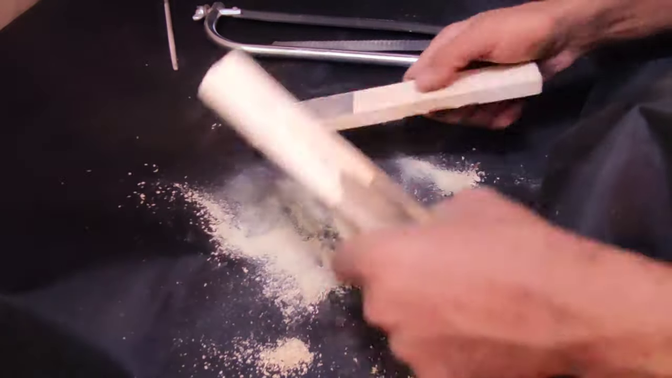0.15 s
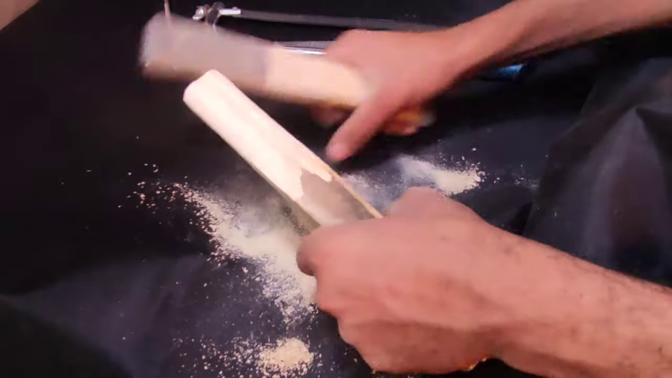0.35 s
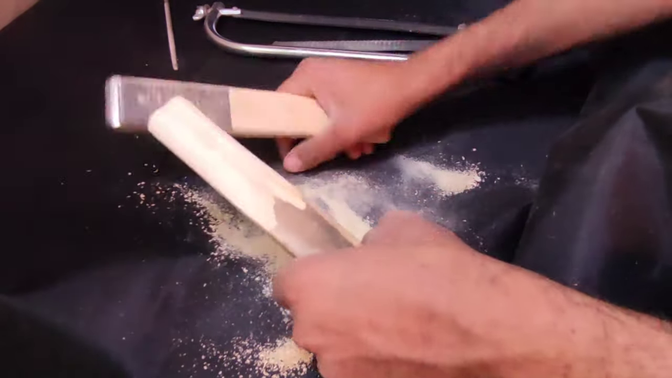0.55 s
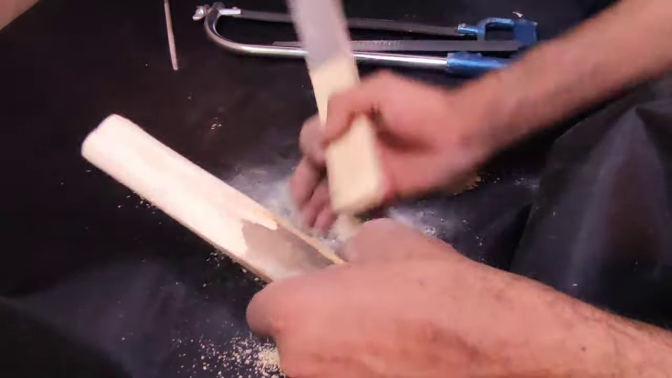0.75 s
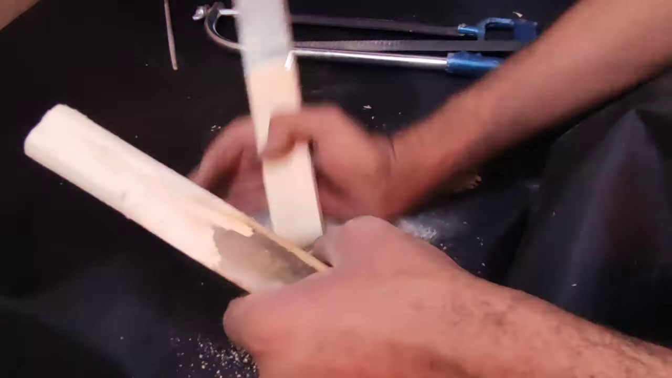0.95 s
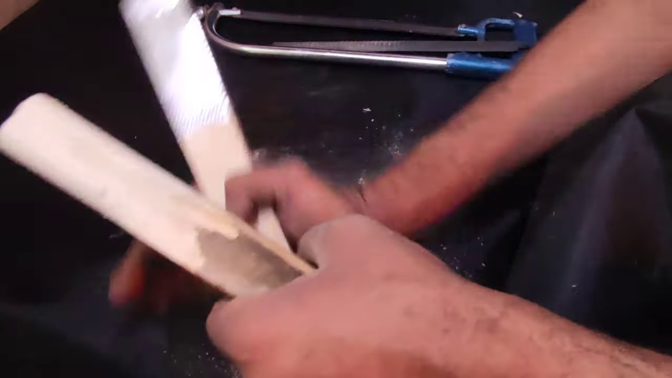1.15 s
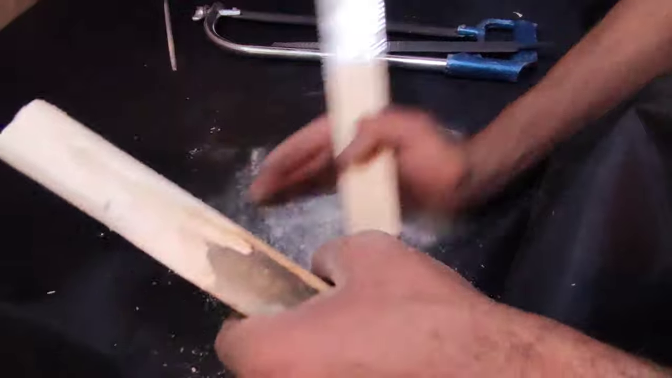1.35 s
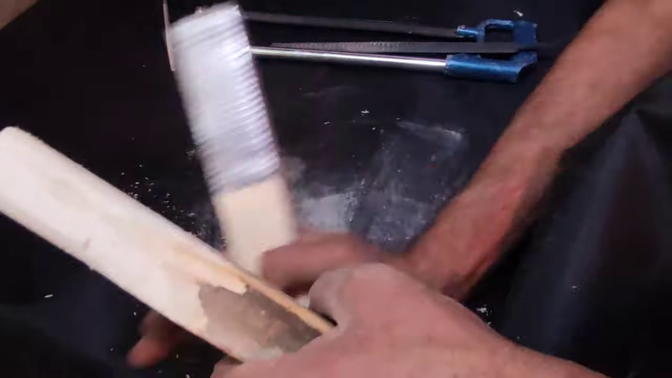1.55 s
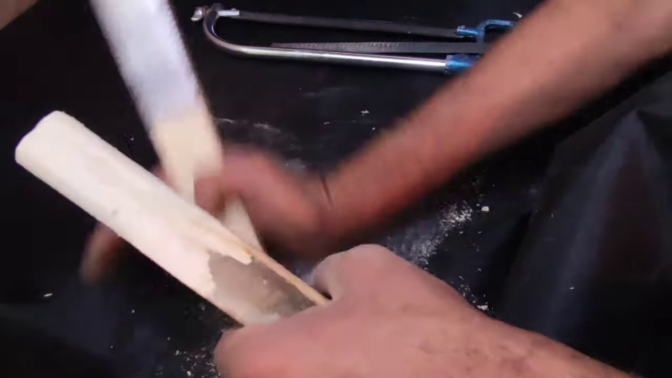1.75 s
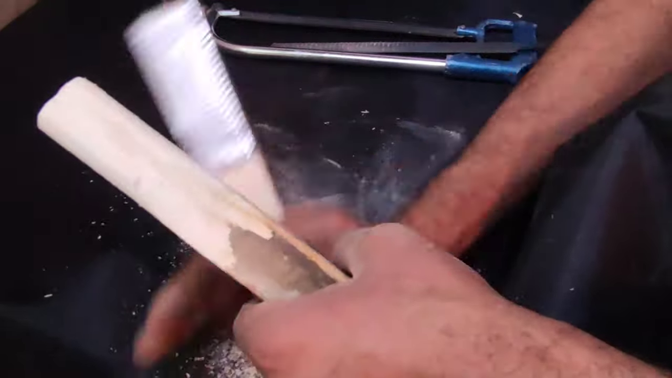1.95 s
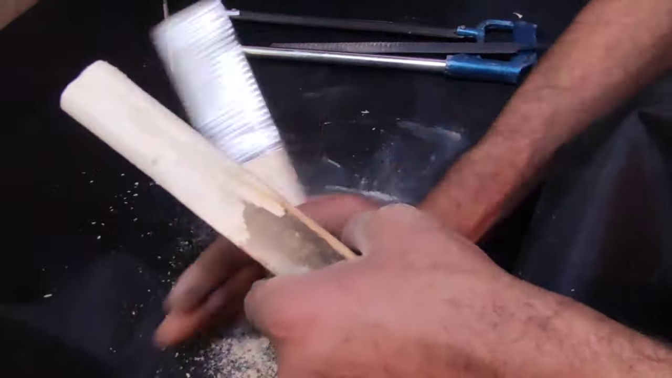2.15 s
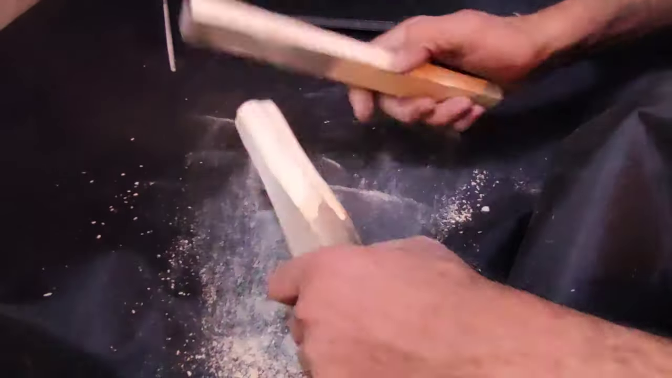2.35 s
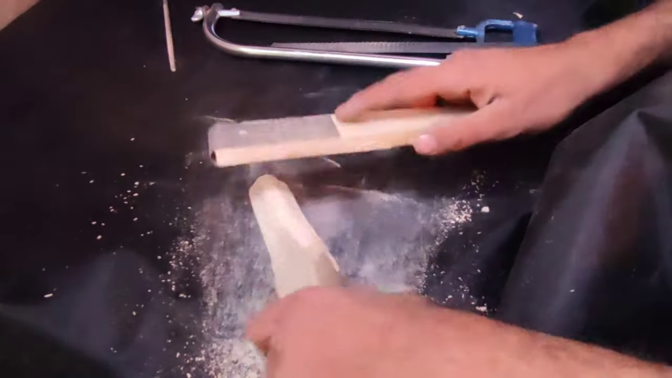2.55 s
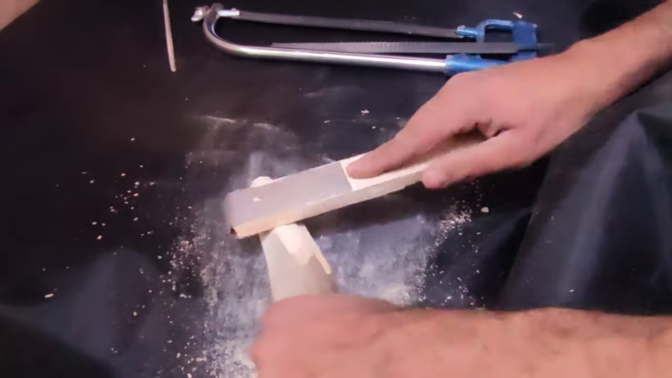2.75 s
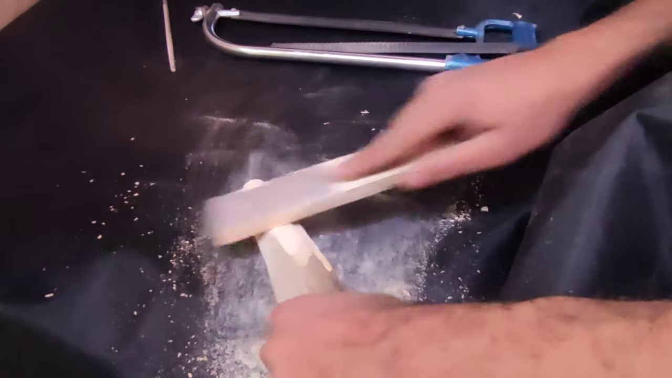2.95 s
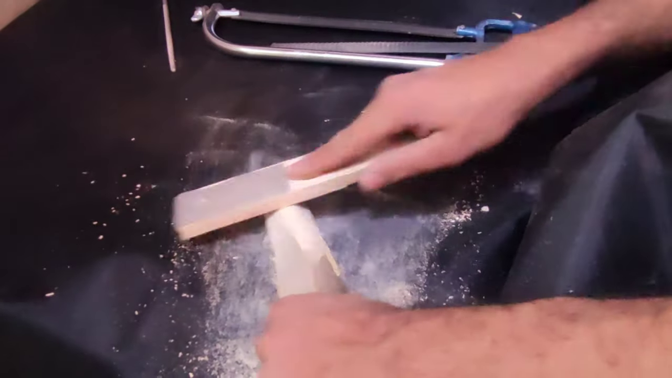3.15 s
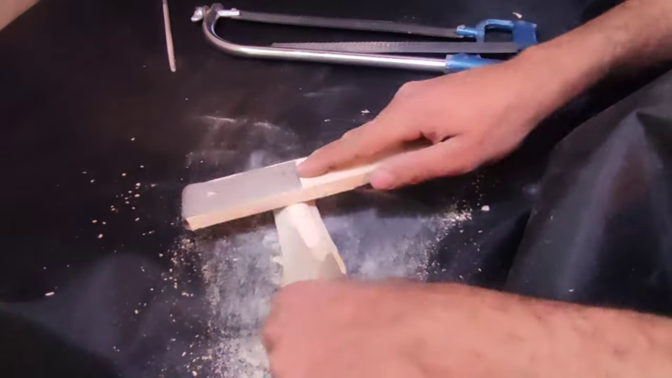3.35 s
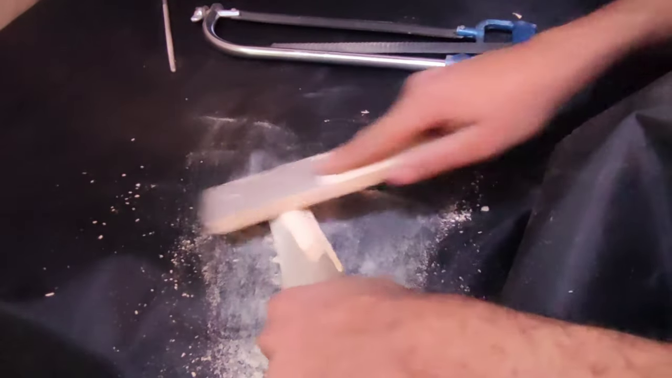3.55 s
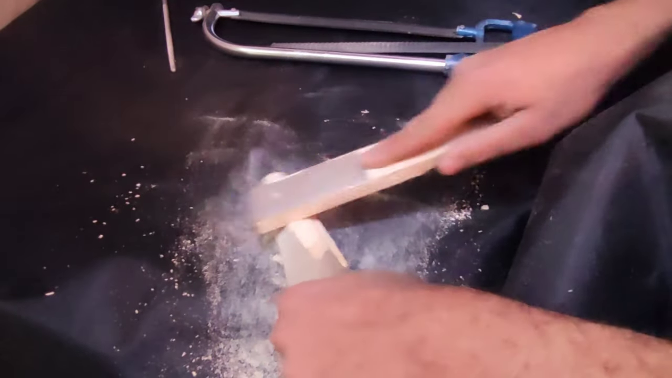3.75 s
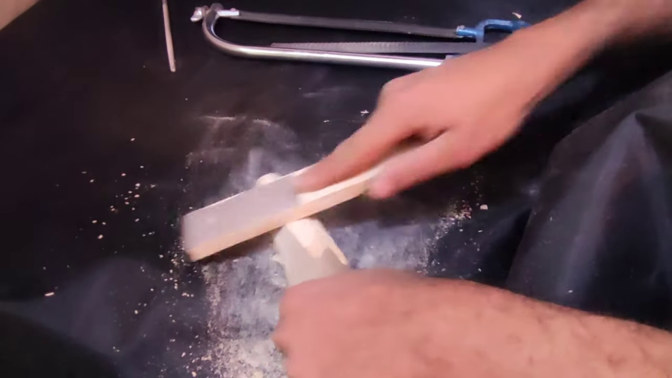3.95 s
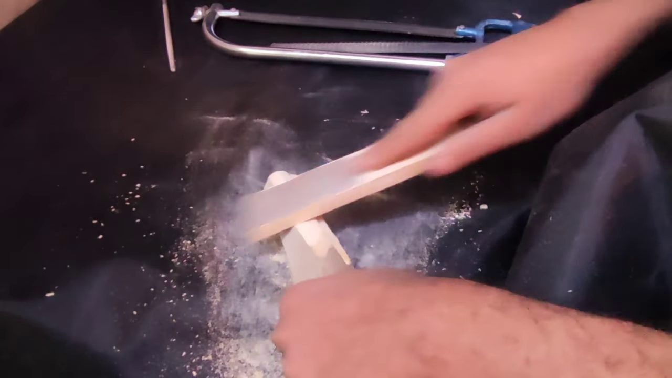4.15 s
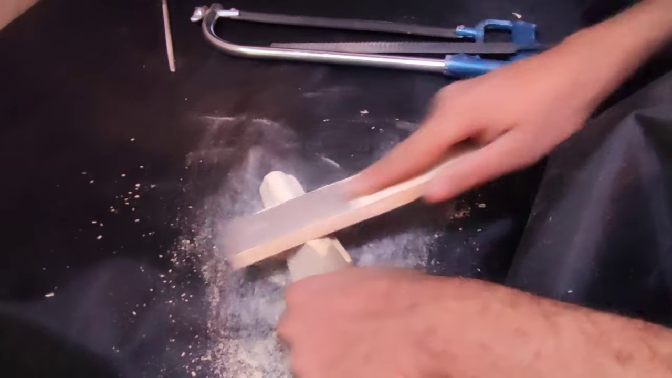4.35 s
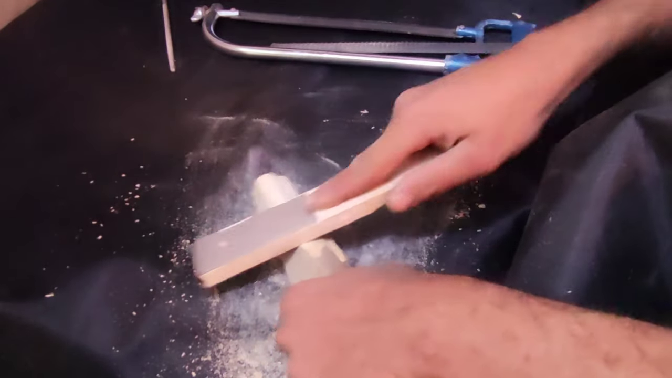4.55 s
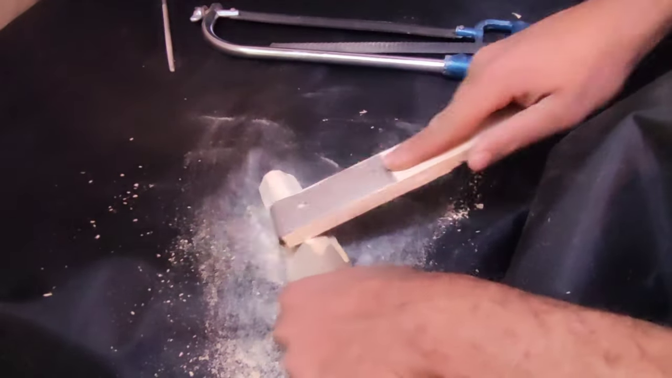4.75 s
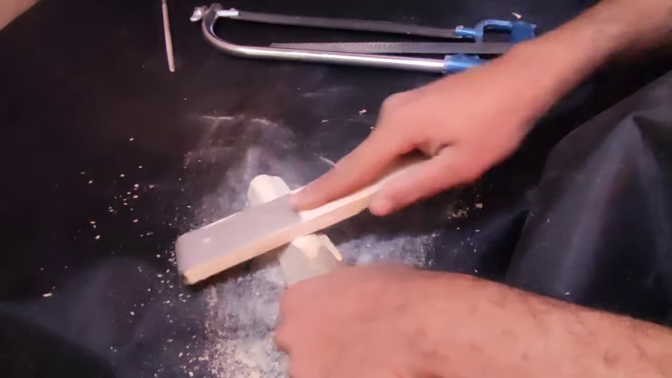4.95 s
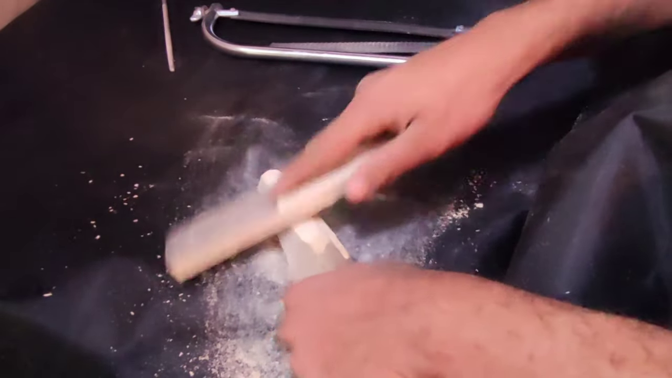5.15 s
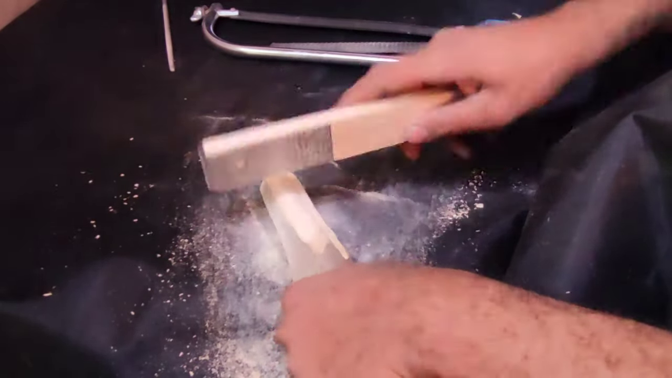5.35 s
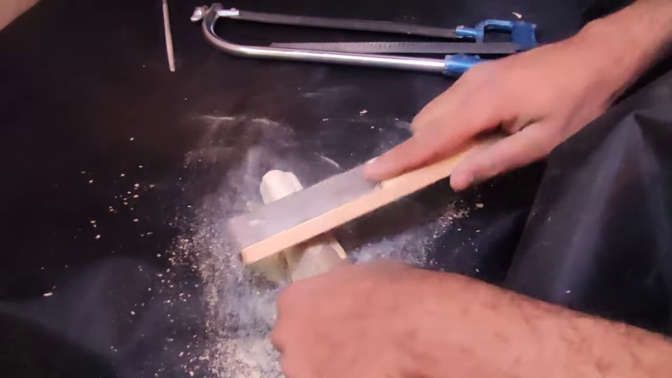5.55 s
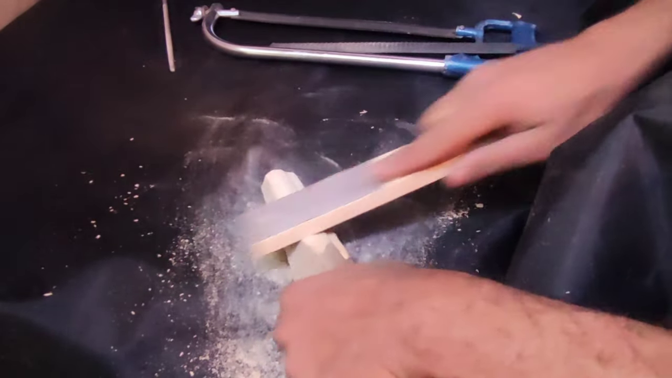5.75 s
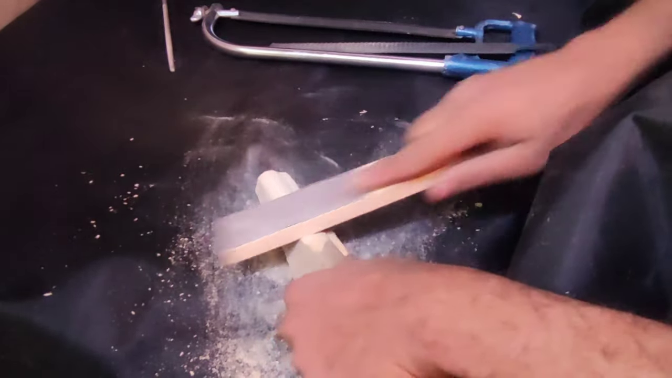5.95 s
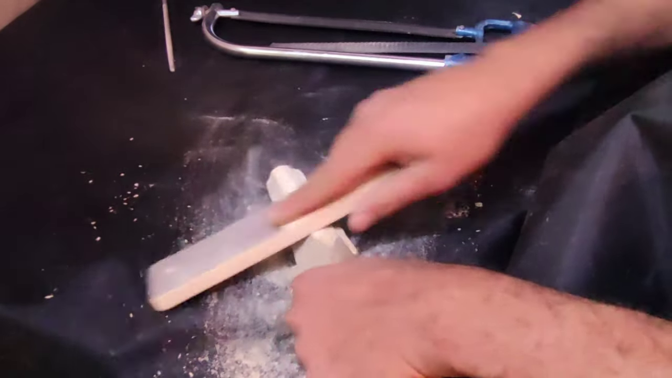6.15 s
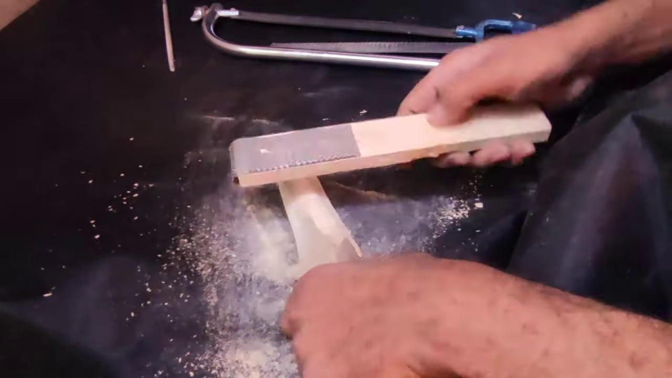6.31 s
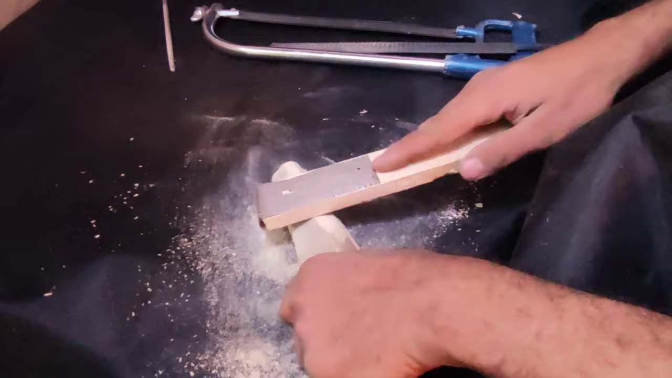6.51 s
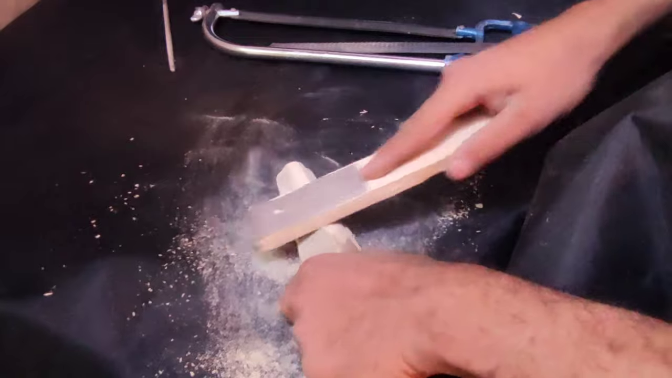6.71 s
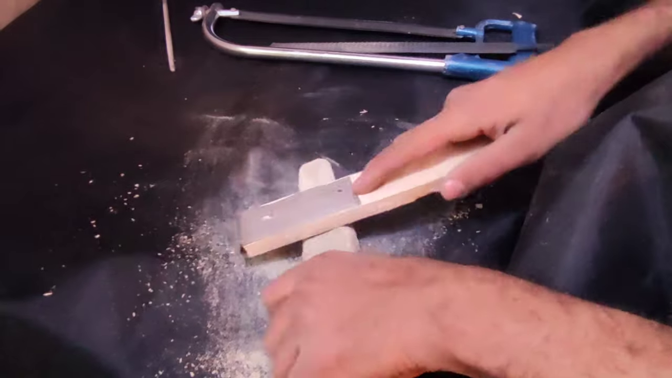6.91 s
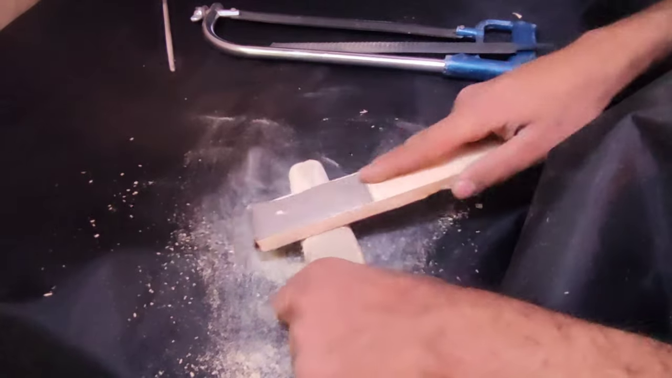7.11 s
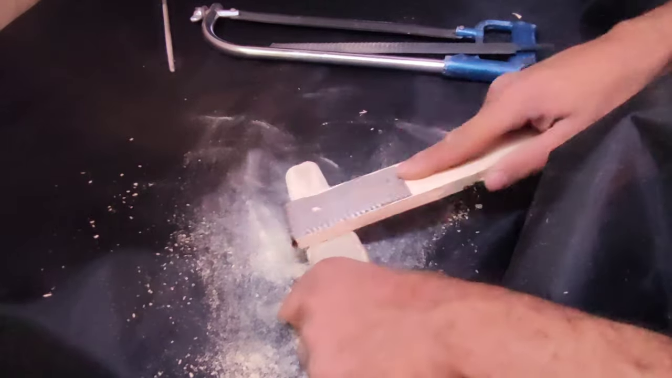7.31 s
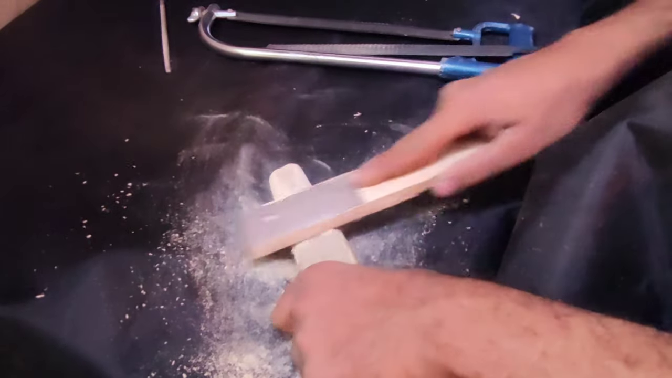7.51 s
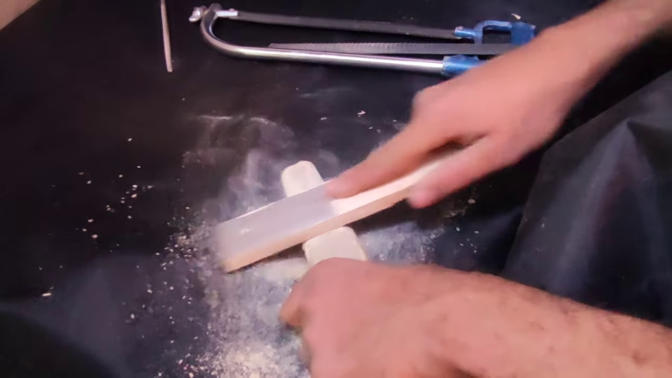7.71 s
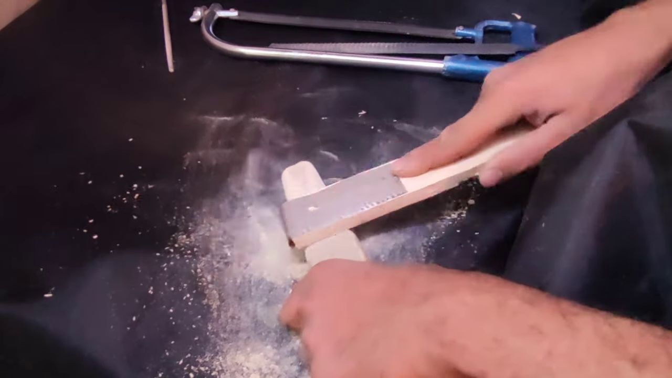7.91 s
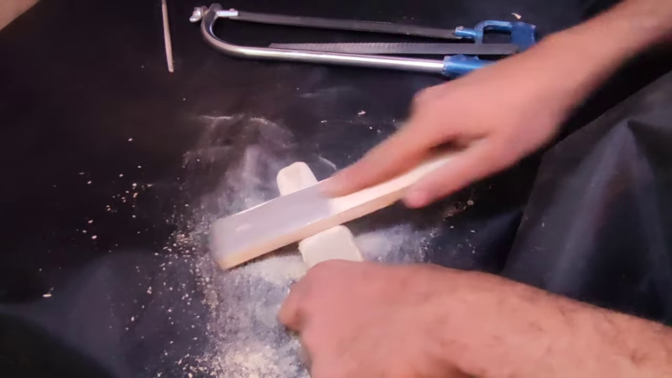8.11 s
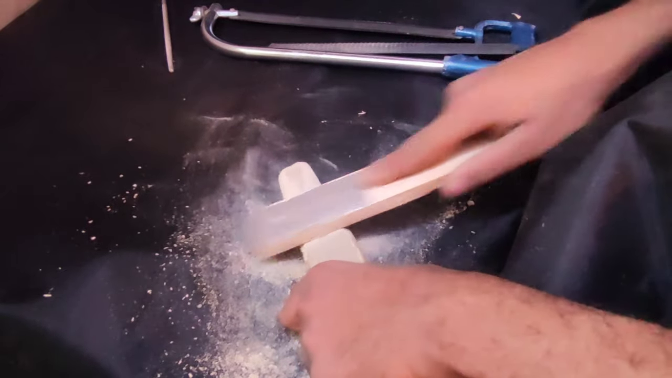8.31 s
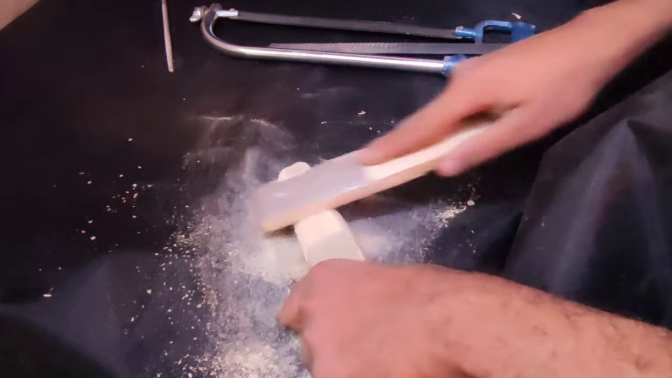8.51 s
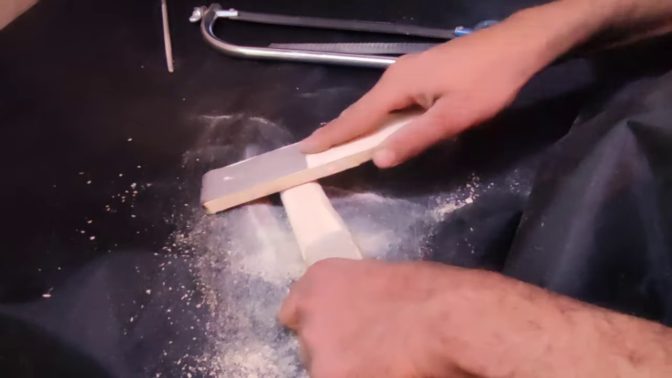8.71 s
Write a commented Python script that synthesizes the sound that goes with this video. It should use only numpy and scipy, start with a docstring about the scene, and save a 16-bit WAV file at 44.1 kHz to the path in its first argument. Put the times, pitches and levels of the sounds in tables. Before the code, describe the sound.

A hand softly sweeps sawdust off cloth, then a toothed file rasps a wooden stick in quick back-and-forth bouts with short pauses.

```python
"""A toothed file on a wooden handle rasps a stick to and fro, after a hand sweeps sawdust off a bench cloth.
Teeth catching fibres hiss in the file and drive the resonances of the stick and the bench it is pressed on.
Blows ring the work when the tool is set to it, chips and snags tick, and the arm's pressure rumbles below.
The small workshop adds a dull, short spray of echoes; two spaced microphone ports hear it over soft air."""
import sys
import numpy as np
from scipy import signal
from scipy.fft import rfft, irfft, next_fast_len
from scipy.io import wavfile

SR = 44100
rng = np.random.default_rng(int(sys.argv[2]) if len(sys.argv) > 2 else 0)


def volts(x):
    """Linear amplitude factor 10**(x/20) for a level x in dB, scalar or array-like."""
    e = np.asarray(x, float) / 20
    return 10 ** e


def wav_out(sig):
    """Save sig, one row per channel (or a flat mono array), as 16-bit PCM at SR to the path in sys.argv[1]."""
    wavfile.write(sys.argv[1], SR, np.round(np.clip(np.atleast_2d(sig).T, -1, 1) * 32767).astype(np.int16))


N = 386757
SIZE = next_fast_len(N + SR // 2)  # room for the echoes
HZ = np.maximum(np.arange(SIZE // 2 + 1) * SR / SIZE, 1.0)

# hand over the cloth: (top speed [s], rise [ms], fall [ms], dust hiss [dB], palm [dB])
SWEEPS = [(0.031, 62, 14, -64, -58), (0.17, 30, 51, -64, -61.5), (0.282, 55, 23, -63.5, -66),
          (0.332, 23, 46, -58, -89), (0.426, 26, 66, -74, -59), (0.525, 26, 24, -66, -60.5),
          (0.568, 16.4, 28, -63, -68), (0.798, 24.5, 24, -52.5, -51.5), (0.971, 21, 42, -43, -42),
          (1.172, 33.5, 26, -36.5, -43), (1.359, 27, 49.4, -38.5, -46), (1.544, 31, 42.6, -37.5, -42.5),
          (1.774, 40, 24.5, -35.5, -45.5), (1.972, 56, 27.4, -40, -45), (2.085, 11, 13, -50, -58.5),
          (2.159, 48, 25, -43, -46), (2.615, 52, 43, -64.5, -59.5), (3.267, 22, 33, -67, -55.5),
          (5.317, 55, 27, -64.5, -78), (5.541, 20, 22, -65, -86), (6.283, 37, 32, -64, -65.5),
          (6.486, 27, 13, -59, -58), (6.894, 31, 54, -63, -59), (6.997, 23, 12, -73, -59.5),
          (7.054, 16, 19, -63, -51.5)]
# resonances of bench, its low thump, stick and file blade: (frequency [Hz], width [Hz], level [dB])
BENCH_MODES = [(217.6, 33.7, 2.5), (298.8, 26.4, 1), (327, 15.8, -4), (399.5, 21.8, -2), (460.8, 43, -7.5)]
THUMP_MODES = [(102, 7.3, 8), (145, 36, 0)]
STICK_MODES = [(547, 60, -4.5), (719, 75, 4.5), (878, 150, -3.5), (986, 47, -2.5), (1153, 67, 3.5),
               (1230, 53, -8.5), (1445, 153, -6.5)]
BLADE_MODES = [(1950, 294, -4.5), (2370, 290, 3.5), (2740, 400, -4.5)]
# colour of chips and grit: (frequency [Hz], level [dB])
CHIP_COLOUR = [(500, -42), (1800, 0), (3500, -0.5), (6500, 7.5), (8500, -7.5), (12000, -16.5), (16000, -20)]


def at_hz(points):
    """Reads a spectrum table at every frequency bin, along a logarithmic pitch axis."""
    hz, value = np.transpose(points)
    return np.interp(np.log(HZ), np.log(np.maximum(hz, 1.0)), value)


def in_time(rows):
    """Reads the columns of a time table at every sample."""
    s, *columns = np.transpose(rows)
    return [np.interp(np.arange(N) / SR, s, c) for c in columns]


def body(modes):
    """Frequency response of damped resonators in parallel, signs alternating."""
    response = 0
    for k, (hz, width, db) in enumerate(modes):
        damping = 1j * HZ * width
        response = response + (-1) ** k * volts(db) * damping / (hz ** 2 - HZ ** 2 + damping)
    return response


def through(force, response, low_hz, high_hz):
    """Spectrum of a filtered force; white force of rms 1 comes out with rms 1 between the two edges."""
    inside = (HZ > low_hz) & (HZ < high_hz)
    band_rms = np.sqrt(np.sum(np.abs(response[inside]) ** 2) / len(HZ))
    return rfft(force, SIZE) * response / band_rms


def tilted(force, modes, tilt_db, low_hz, high_hz):
    """Drives the lower and upper half of the modes with strengths that see-saw at constant power."""
    upper = 1 / (1 + volts(-2 * tilt_db))  # share of power
    split = len(modes) // 2
    return (through(force * np.sqrt(1 - upper), body(modes[:split]), low_hz, high_hz)
            + through(force * np.sqrt(upper), body(modes[split:]), low_hz, high_hz))


def drift(rate_hz):
    """Slow random swing of spread 1: noise through two equal poles, made at every 40th sample."""
    r = np.exp(-80 * np.pi * rate_hz / SR)
    noise = rng.standard_normal(N // 40 + 2002)
    slow = signal.lfilter([1], [1, -2 * r, r * r], noise)[2000:]  # drop the run-in
    return np.interp(np.arange(N) / 40, np.arange(len(slow)), slow / slow.std())


def catches(per_s, spread_db, lumps_db):
    """Fibres or grains catch at random, in clumps, with uneven force, at two places of the work; rms 1."""
    born = rng.random((2, N)) < per_s / SR
    sizes = volts(spread_db * np.minimum(rng.exponential(1, (2, N)), 5))
    signs = np.sign(rng.random((2, N)) - .5)
    force = born * sizes * signs * volts(lumps_db * drift(41))
    return force / force.std()


def passes(rows, rise_edge, fall_edge):
    """One hump of speed per row, 8 dB down at its rise and fall time; one envelope per level column."""
    rows = np.array(rows, float)
    power = np.zeros((rows.shape[1] - 3, N))
    for s, rise_ms, fall_ms, *levels_db in rows:
        first = max(int((s - .004 * rise_ms) * SR), 0)  # four rise times ahead
        last = min(int((s + .004 * fall_ms) * SR), N)
        ms = (np.arange(first, last) / SR - s) * 1000
        span_ms = np.where(ms < 0, rise_ms, fall_ms)
        hump_db = -8 * np.abs(ms / span_ms) ** np.where(ms < 0, rise_edge, fall_edge)
        power[:, first:last] += volts(hump_db + np.array(levels_db)[:, None]) ** 2
    return np.sqrt(power)


def strokes():
    """Rows for passes(): a harder cut peaks later in the stroke and shakes the bench more."""
    # file strokes: (middle [s], length [ms], teeth [dB], force into the wood [dB])
    stroke_rows = [(2.83, 40, -45, -38), (2.903, 48, -42.5, -39.5), (2.978, 41, -41.5, -34.5),
                   (3.051, 37, -41.5, -39.5), (3.12, 46, -42, -36), (3.19, 36, -52, -52.5),
                   (3.427, 57, -48, -49), (3.516, 37, -43, -40), (3.587, 40, -40.5, -39.5),
                   (3.662, 51, -43.5, -37), (3.732, 42.5, -40.5, -38.5), (3.801, 42, -42, -37.5),
                   (3.874, 51, -43.5, -39.5), (3.949, 41, -40, -37.5), (4.013, 45, -43, -41),
                   (4.101, 63, -43, -39.5), (4.162, 47, -42, -42.5), (4.242, 51, -44.5, -40),
                   (4.318, 43, -44.5, -39.2), (4.383, 47.6, -40.5, -34), (4.461, 52, -45, -40),
                   (4.537, 43, -44, -38.5), (4.612, 50, -41.5, -41), (4.685, 44, -43.5, -38.5),
                   (4.755, 54, -45, -43.5), (4.833, 37.5, -39, -34), (4.9, 52, -43.5, -39),
                   (4.981, 58, -39, -37.5), (5.05, 44, -43, -40), (5.131, 54.5, -37, -36.2),
                   (5.227, 20, -51, -78), (5.69, 43.6, -42.5, -38), (5.771, 59, -41.5, -44),
                   (5.835, 57, -42, -39.5), (5.913, 46, -42, -40.5), (5.989, 48, -41.5, -35.5),
                   (6.069, 49, -42.5, -42.5), (6.155, 56, -39.5, -38), (6.669, 48, -52.5, -44.5),
                   (6.748, 62, -50.5, -43.5), (6.821, 47, -48, -37.1), (7.231, 47, -46, -37),
                   (7.309, 51, -45, -45), (7.387, 50, -42, -36.5), (7.458, 50, -41, -42.5),
                   (7.545, 44, -42.5, -32.5), (7.616, 41, -44.5, -43), (7.688, 53, -42, -36.5),
                   (7.763, 62, -45, -43), (7.84, 51.4, -42, -33), (7.915, 42, -41.5, -43),
                   (7.985, 40, -39, -31.5), (8.055, 46, -42.5, -40.5), (8.133, 46.4, -42.1, -31),
                   (8.201, 63, -43.5, -44), (8.279, 50, -41.5, -31.5), (8.351, 56, -44, -44),
                   (8.425, 45.7, -41.0, -30.5), (8.495, 53, -46.5, -42.5), (8.566, 46, -45, -36.5),
                   (8.634, 38.5, -41.5, -41.5), (8.71, 49, -41.5, -33.5), (8.764, 15, -48.5, -40)]
    s, length_ms, teeth_db, force_db = np.transpose(stroke_rows)
    harder_db = force_db + 40
    late_ms = np.clip(1.06 * harder_db, -8, 8)
    rise_ms, fall_ms = length_ms / 2 + late_ms, length_ms / 2 - late_ms
    stick_db, bench_db = force_db + 1, force_db + 3.5 + 0.24 * harder_db
    return np.transpose([s + late_ms / 1000, rise_ms, fall_ms, teeth_db, stick_db, bench_db])


def air():
    """Still air and microphone hiss: coloured noise, partly alike on both sides, slightly restless."""
    # colour: (frequency [Hz], level [dB])
    air_colour = [(18, -33), (30, 9.5), (149, -10.5), (311, -11), (616, -19), (760, -19.5), (1350, -30),
                  (2610, -20), (3980, -29.5), (6900, -28), (8740, -35), (14800, -31), (16000, -39)]
    # left-right likeness: (frequency [Hz], correlation [-1 to 1])
    air_likeness = [(60, 0.089), (180, 0.36), (550, 0.23), (1650, 0.12), (4970, 0.043), (15000, 0.94)]
    alike = np.clip(at_hz(air_likeness), -1, 1)
    level = volts(-65 + 2.5 * drift(1.7))
    mid, side = through(level * rng.standard_normal((2, N)), volts(at_hz(air_colour)), 97, 16000)
    return (np.sqrt(1 + alike) * mid + np.sqrt(1 - alike) * side * [[1], [-1]]) / np.sqrt(2)


def shop():
    """Response of the walls: a dying spray of echoes, dull, thin in the bass, its own on each side."""
    t60_s, bass_cut_hz, wall_cut_hz = 0.1, 700, 1770
    s = np.arange(SR // 2) / SR
    echoes = rng.standard_normal((2, len(s))) * volts(-60 * s / t60_s) * (s > .003)
    colour = (HZ / (HZ - 1j * bass_cut_hz)) ** 2 / (1 + 1j * HZ / wall_cut_hz)
    return rfft(echoes, SIZE) * colour / np.sqrt(np.sum(echoes[0] ** 2))


def leaning():
    """The arm's pressure and lurches shake the lowest bench modes, most within each stroke."""
    # arm pressure between strokes: (time [s], rumble [dB], thump [dB])
    pressure = [(0.0, -59.5, -72), (0.83, -74, -69), (1.56, -52.5, -68.5), (2.56, -75.5, -60),
                (3.0, -53, -48), (3.2, -59, -62), (3.44, -64, -60), (3.66, -47, -48.5), (4.88, -62, -50),
                (5.35, -76, -64), (5.74, -54, -52), (5.98, -47, -55), (6.42, -88, -73), (6.76, -58, -52.5),
                (7.08, -57.5, -63), (7.45, -59, -57), (7.86, -54.5, -59), (8.77, -53, -52)]
    # the arm lurches against the bench: (time before the delay [s], rumble [dB], thump [dB])
    jolts = [(1.327, -45.5, -62), (2.127, -49, -69), (2.579, -59, -46), (2.964, -39, -54),
             (3.115, -38.5, -41), (3.419, -54, -46), (3.832, -47, -41), (3.963, -49, -40.5),
             (4.232, -37.5, -49), (4.509, -37, -47), (4.679, -40, -31), (4.825, -38, -45),
             (4.977, -33, -36.5), (5.619, -46, -37), (5.963, -38, -58), (6.169, -47, -50),
             (6.501, -51.5, -49.5), (6.654, -42, -52), (7.539, -61, -39), (7.984, -53, -36),
             (8.446, -47, -34.5), (8.7, -48, -38)]
    # resonance of the rumble: (frequency [Hz], width [Hz], level [dB])
    rumble_modes = [(39, 48, 0)]
    delay_s, rise_ms, fall_ms = 0.0058, 30, 33
    rumble_db, thump_db = in_time(pressure)
    stroke_humps = [(*row[:3], 0) for row in strokes()]
    moving = np.minimum(passes(stroke_humps, rise_edge=1.8, fall_edge=0.98)[0], 1)
    lurch_rows = [(s + delay_s, rise_ms, fall_ms, *db) for s, *db in jolts]
    lurch = passes(lurch_rows, rise_edge=4.8, fall_edge=0.62)
    rumble = np.hypot(volts(rumble_db + 1.6 * moving + 1.8 * drift(9.3)), lurch[0])
    thump = np.hypot(volts(thump_db + 9.3 * moving + 2.5 * drift(2.5)), lurch[1])
    # the stiff legs pass little outside these modes
    rumble_body = body(rumble_modes) ** 2 * (HZ / (HZ - 1j * 24)) ** 2
    thump_body = body(THUMP_MODES) * body([(101, 43, 0)])
    return (through(rumble * rng.standard_normal(N), rumble_body, 21, 84)
            + through(thump * rng.standard_normal(N), thump_body, 71, 202))


def ticks():
    """Chips, snags and touches: short noise bursts, bright at the contact and hollow in the wood."""
    # (time [s], click drive [dB], decay by 60 dB [ms], wood over click drive [dB])
    tick_rows = [(0.134, -48.5, 12, 13), (0.412, -52, 51, 11), (0.874, -48, 24, -19),
                 (0.903, -50, 140, 2.5), (1.165, -25, 8.9, -10), (1.237, -42, 32, -1),
                 (1.307, -31.5, 47, -2), (2.088, -33.5, 11, -2), (2.322, -34.5, 48, -27),
                 (2.722, -41, 14, -15), (3.255, -52.5, 42, 6), (4.255, -23.5, 10, -3),
                 (4.996, -18.5, 12, -13), (5.255, -54, 20, 13), (5.304, -44.5, 29, -2),
                 (6.162, -22, 16.8, 6), (6.172, -14, 5.3, -8), (6.292, -42, 19, -26), (6.575, -43, 9.7, -7),
                 (6.618, -50, 140, 7.5), (7.132, -28, 50, -9.5), (7.997, -18, 7, 0), (8.349, -24, 17, -17),
                 (8.462, -33, 10, -15), (8.573, -24.5, 16, -10)]
    click, wood, noise = np.zeros(N), np.zeros(N), rng.standard_normal(N)
    ms = np.arange(4000) / SR * 1000
    for s, click_db, t60_ms, wood_db in tick_rows:
        at = int(s * SR)
        rise = 1 - np.exp(-ms / (0.064 * t60_ms))
        burst = volts(click_db - 60 * ms / t60_ms) * rise
        click[at:at + len(ms)] += burst
        wood[at:at + len(ms)] += burst * volts(wood_db)
    return (through(click * noise, volts(at_hz(CHIP_COLOUR)), 1500, 12000)
            + through(wood * noise, body(STICK_MODES) + 3.1 * body(BENCH_MODES), 150, 810))


def knocks(bounce_ms=9, bounce_db=-5, soft_hz=1600):
    """A blow and two soft bounces ring bench and stick; grit crunches briefly under the blade."""
    # tool meets stick: (time [s], bench drive [dB], stick and grit over bench drive [dB])
    blows = [(2.577, -32.5, -22), (2.753, -22.5, -18.5), (5.465, -21, -12.5), (5.598, -17, -17.5),
             (6.646, -22, -20)]
    low, high, grit = np.zeros(N), np.zeros(N), np.zeros(N)
    ms = np.arange(2000) / SR * 1000
    for s, bench_db, stick_db in blows:
        grit[int(s * SR):int(s * SR) + len(ms)] = volts(bench_db + stick_db - 1.8 * ms)
        for k in range(3):
            at = int((s + k ** 1.5 * bounce_ms / 1000) * SR)
            low[at] = volts(bench_db + k * bounce_db)
            high[at] = volts(bench_db + stick_db + k * bounce_db)
    soft = 1 / (1 + 1j * HZ / soft_hz) ** 2  # a soft contact dulls the blow
    crunch = body(BLADE_MODES) + 0.22 * volts(at_hz(CHIP_COLOUR))
    return (volts(17) * through(low, soft * body(BENCH_MODES), 150, 500)
            + volts(7.0) * through(low, soft * body(THUMP_MODES), 80, 106)
            + volts(18.5) * through(high, soft * body(STICK_MODES), 500, 1500)
            + volts(-6.5) * through(grit * rng.standard_normal(N), crunch, 1800, 9000))


def hollow(width_hz=110):
    """The rubbed tool and its handle sing brief narrow notes: a slow random swing on a sine."""
    # notes of the tool: (middle [s], length [ms], level [dB], pitch [Hz])
    tool_notes = [(.02, 49, -53.5, 570), (0.421, 20, -55, 1095), (1.988, 17, -36.5, 980),
                  (2.13, 27, -44, 1125), (3.425, 50, -56, 2144), (6.168, 18, -33, 942),
                  (8.635, 35, -40, 2340)]
    # the handle sings as each sweep slows, 9 dB under its dust hiss
    handle_notes = [(s + 0.64 * fall_ms / 1000, 38, dust_db - 9, 723)
                    for s, _, fall_ms, dust_db, _ in SWEEPS]
    out, swing = np.zeros(N), drift(width_hz) + 1j * drift(width_hz)
    for s, ms, db, hz in tool_notes + handle_notes:
        level = passes([(s, ms / 2, ms / 2, db)], rise_edge=4.0, fall_edge=4)[0]
        on = np.flatnonzero(level)
        tone = np.exp(2j * np.pi * hz * on / SR)
        out[on] += level[on] * np.real((1 + 1.16 * swing[on]) * tone)
    return rfft(out, SIZE)


def sweeping():
    """Grains hiss under the hand, fall from the file and rustle on; the palm drags the cloth, duller."""
    # colour of the dust: (frequency [Hz], level [dB])
    dust_colour = [(900, -22), (1700, 0), (3490, -1), (5000, 4), (6760, 6.5), (8740, -4.5), (12000, -9.5),
                   (16000, -11)]
    # resonances of palm on cloth: (frequency [Hz], width [Hz], level [dB])
    palm_modes = [(267, 200, 3), (566, 550, 3.5), (1140, 810, 6.5), (1820, 110, -4.5)]
    # cloth and sleeves never quite rest: (time [s], level [dB])
    rustle = [(0.0, -65), (0.55, -90), (1.0, -61), (1.8, -76), (2.6, -68.5), (3.37, -78), (5.28, -74),
              (5.55, -68.5), (6.4, -74), (7.1, -67.5), (8.77, -76)]
    fall_db, settle_s = -22, 0.15  # falling dust under the teeth, time to settle
    rustle_db = in_time(rustle)[0]
    dust, palm = passes(SWEEPS, rise_edge=3.65, fall_edge=2.63)
    teeth = passes(strokes(), rise_edge=2.4, fall_edge=2.9)[0]
    r = np.exp(-1 / (settle_s * SR))
    falling = signal.lfilter([1 - r], [1, -r], teeth ** 2 + 1e-18)  # power
    restless = np.sqrt(volts(rustle_db) ** 2 + volts(fall_db) ** 2 * falling)
    dust = np.hypot(dust, restless * volts(0.67 * drift(7.3)))
    # the rustle has a dull side too
    palm = np.hypot(palm, volts(rustle_db - 6.5 + 0.94 * drift(8.1)))
    grains = catches(14000, spread_db=2.5, lumps_db=2.47)
    return (through(dust * grains, volts(at_hz(dust_colour)), 1200, 12000)
            + through(palm * grains, body(palm_modes), 590, 1400))


def filing():
    """Fine catches hiss in teeth and blade; coarser tearing drives stick and bench."""
    # the contact spot wanders, favouring other modes: (time [s], blade over teeth [dB],
    # upper over lower stick modes [dB], upper over lower bench modes [dB], tip over stick [dB])
    spot = [(2.7, 2, 0, 3, -7), (3.2, 3.5, 0.5, 2, -5), (3.8, 3.5, -4.5, -0.5, -6.5),
            (4.4, -3.5, -5, 0.5, -7.5), (5.1, -2, -1, 0.5, -12), (5.6, -4.5, -4.5, -2.5, -12),
            (6.1, -7.5, 4.5, -3.5, -8), (6.6, -7, -21, -14, -15), (6.9, 0, 8, 14, -4),
            (7.2, -2.5, -2, -4.5, -19), (7.6, -4.5, 3.5, 3.5, -11), (8.55, -1.5, 0, -1.5, -13.5),
            (8.7, 6, 2, -3, -26)]
    # how firmly the stick rests on the bench, passing the tearing into it: (time [s], level [dB])
    firmness = [(2.8, 0.5), (3.2, -2.5), (3.45, 1.5), (4.3, -0.5), (5.1, 0), (5.7, 1.5), (5.9, -3),
                (6.2, 1), (6.75, 3.5), (7.3, 0.5), (8.0, -3), (8.7, -0.5)]
    # colour of the teeth: (frequency [Hz], level [dB])
    teeth_colour = [(1500, -19), (3000, 0), (3840, -3), (4400, -4), (5000, 2.5), (5830, -2), (6400, 1),
                    (7030, 2.5), (8740, -9.5), (12200, -16), (16000, -17.5)]
    # higher steel modes, free end of the stick: (frequency [Hz], width [Hz], level [dB])
    tang_modes = [(4460, 380, 4.5), (5070, 260, -1.5)]
    tip_modes = [(1230, 190, 2.5), (1610, 470, -0.5)]
    teeth = passes(strokes(), rise_edge=2.68, fall_edge=2.06)[0]
    stick, bench = passes(strokes(), rise_edge=2.2, fall_edge=1.85)[1:]  # sharper peak at top speed
    fine = catches(7000, spread_db=1.5, lumps_db=2.5)
    coarse = catches(1200, spread_db=3.5, lumps_db=0.5)
    blade_db, stick_tilt_db, bench_tilt_db, tip_db = in_time(spot)
    blade = teeth * volts(blade_db + 0.86 * drift(3.3))
    # the higher steel modes ring where the lower ones are damped
    tang = teeth * volts(-16 - 0.65 * blade_db + 6.9 * drift(31))
    tip = stick * volts(tip_db + 4.1 * drift(23))
    bench = bench * volts(in_time(firmness)[0])
    return (through(teeth * fine, volts(at_hz(teeth_colour)), 2330, 13000)
            + through(blade * (fine + 0.21 * coarse), body(BLADE_MODES), 2100, 2900)
            + through(tang * fine, body(tang_modes), 3500, 6000)
            + tilted(stick * coarse, STICK_MODES, stick_tilt_db + 3.8 * drift(2.54), 440, 1830)
            + through(tip * coarse, body(tip_modes), 1000, 3000)
            + tilted(bench * coarse, BENCH_MODES, bench_tilt_db + 3.5 * drift(15.0), 150, 650))


def ports(common, apart):
    """Each port has its own phase and level at each pitch; part of the rubbing reaches them unlike."""
    # (frequency [Hz], left leads by [radians])
    port_lead = [(300, 0), (690, .3), (1290, 1.8), (1640, 1.9), (1980, .4), (2330, 1.3), (3270, -2.1),
                 (3880, 2.6), (4310, 1.0), (4820, 3.6), (6030, 4.2), (7060, 6.9), (10000, 6.9),
                 (16000, 6.6)]
    # (frequency [Hz], left minus right [dB])
    port_balance = [(60, 3), (110, 1), (200, -1), (380, -1.0), (700, -2), (1290, 1), (2380, 0.5),
                    (4400, -4.5), (8120, 4), (15000, -5)]
    # how far both ports hear the same part of the work: (frequency [Hz], share [0-1])
    port_shared = [(200, 0.95), (400, 0.92), (700, 0.63), (1500, 0.67), (4000, 0), (8000, 0.38), (13000, 1)]
    half = volts(at_hz(port_balance) / 2) * np.exp(.5j * at_hz(port_lead))
    shared = np.clip(at_hz(port_shared), 0, 1)
    both = np.sqrt(1 + shared) * common + np.sqrt(1 - shared) * apart * [[1], [-1]]
    return both / np.sqrt(2) * np.array([half, 1 / half])


def scene():
    """Work on the bench, heard directly and from the walls, over the air."""
    common, apart = filing() + sweeping()
    common = common + leaning() + knocks() + ticks() + hollow()
    direct = ports(common, apart)
    walls = volts(-5.5) * shop() * common
    return irfft(direct + walls + air(), SIZE)[:, :N]


def band_limit(x):
    """A steep low-pass at the top of the band."""
    return signal.sosfilt(signal.butter(12, 16670, fs=SR, output="sos"), x)


def record(dry):
    """The recorder's steep low-pass filter removes the highest treble, above 15.9 kHz."""
    low_pass = signal.ellip(10, .5, 60, 15900, fs=SR, output="sos")
    mix = signal.sosfilt(low_pass, dry)
    return band_limit(mix)


dry = scene()
out = record(dry)
wav_out(out)
```